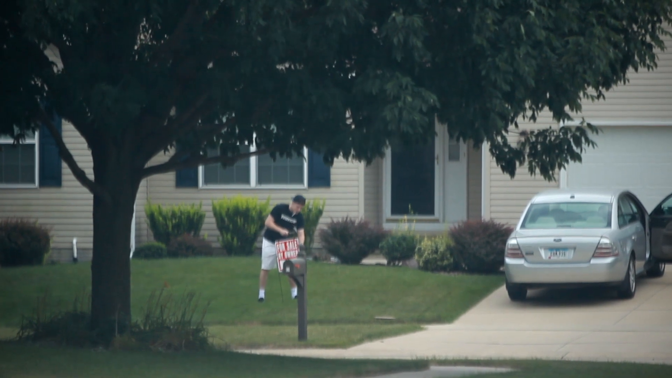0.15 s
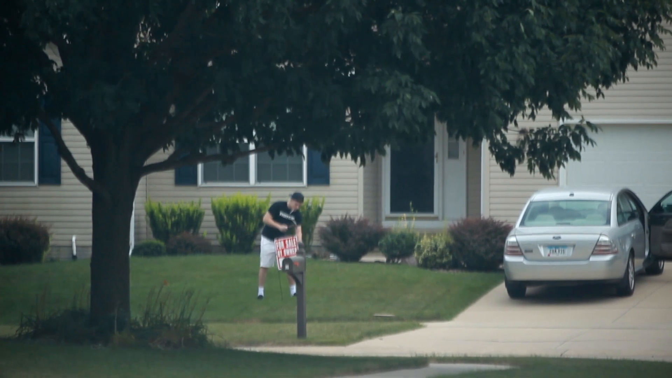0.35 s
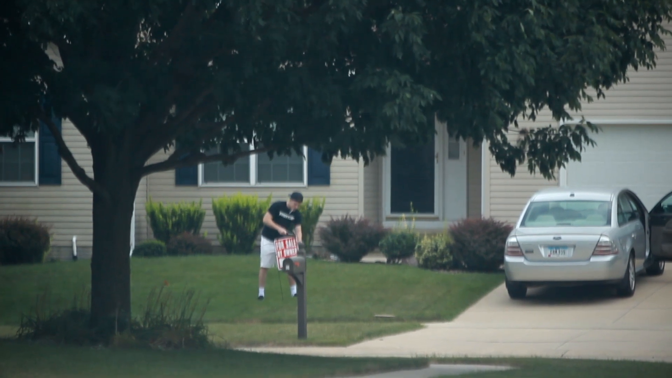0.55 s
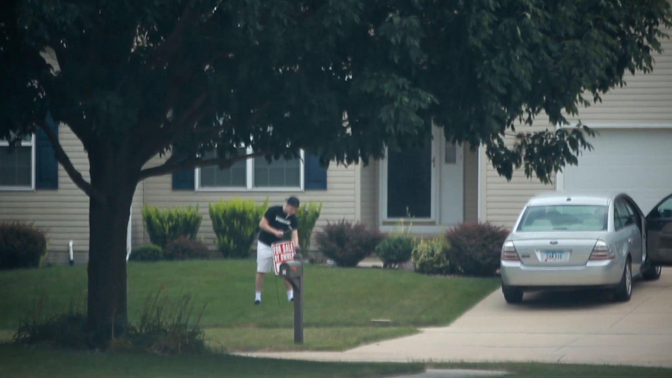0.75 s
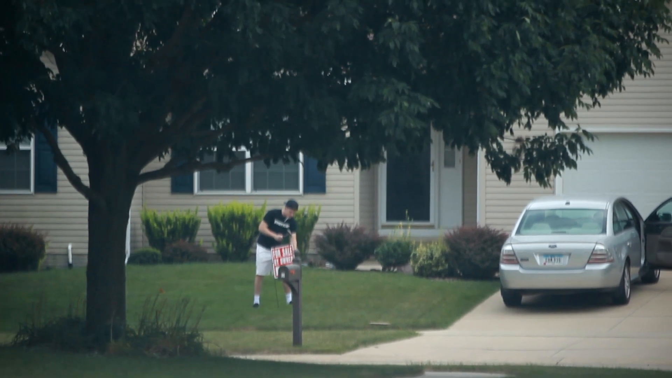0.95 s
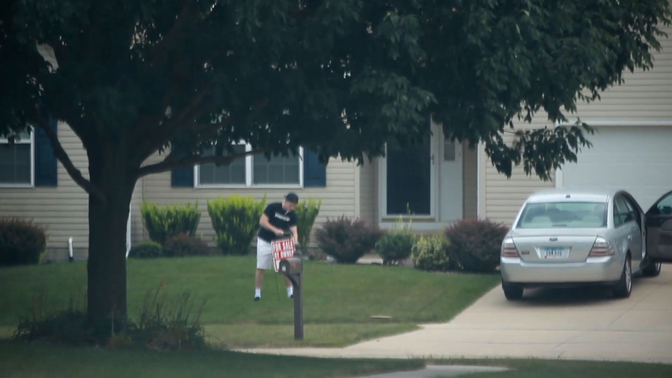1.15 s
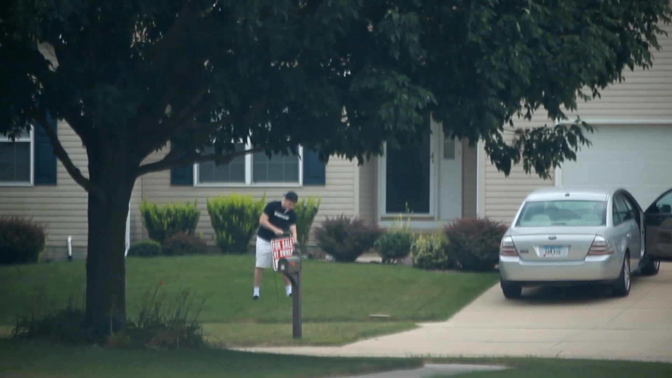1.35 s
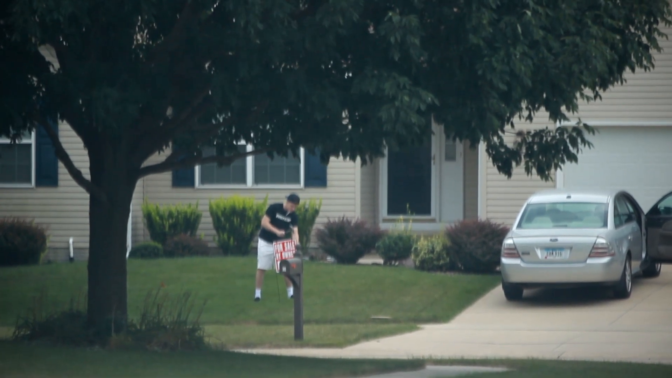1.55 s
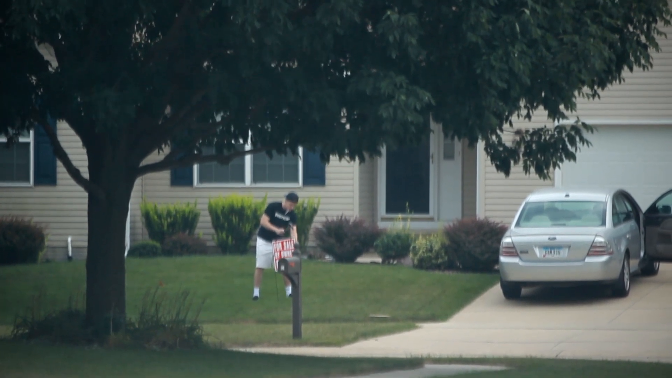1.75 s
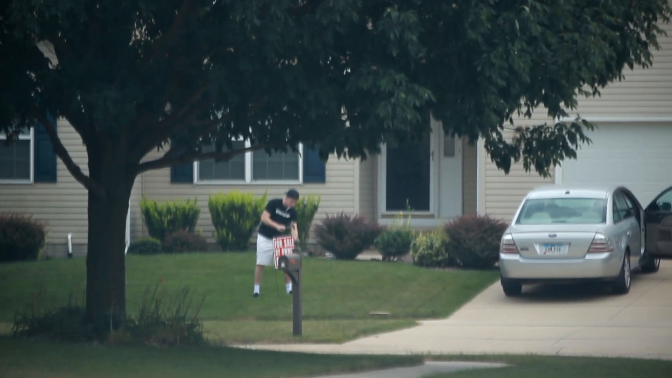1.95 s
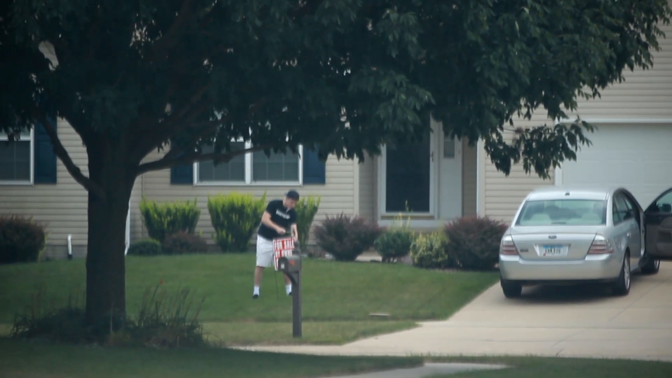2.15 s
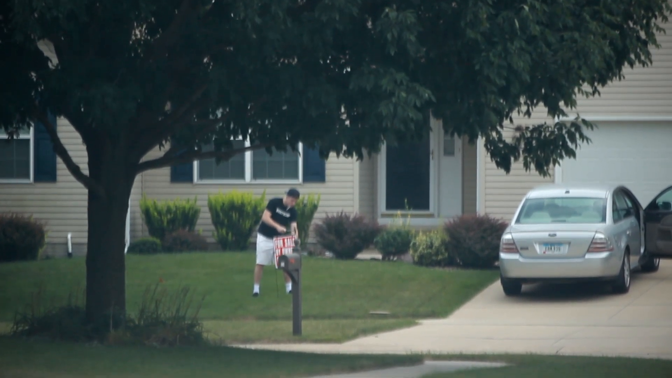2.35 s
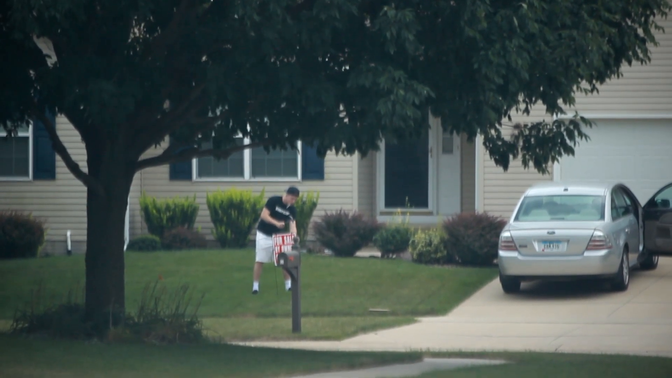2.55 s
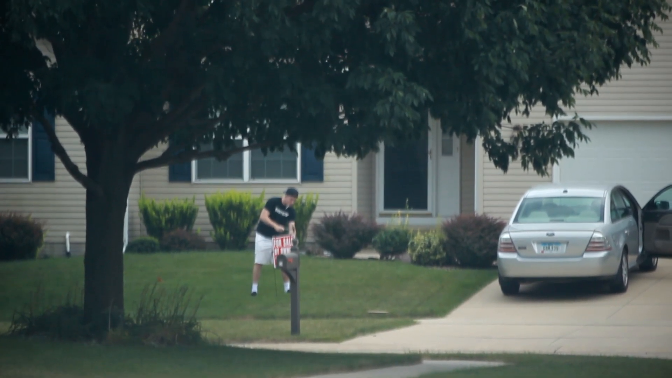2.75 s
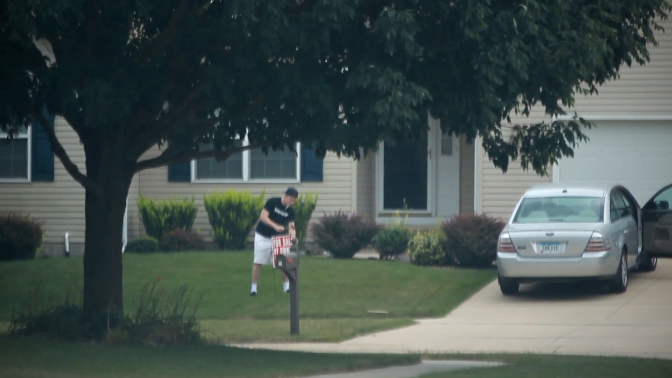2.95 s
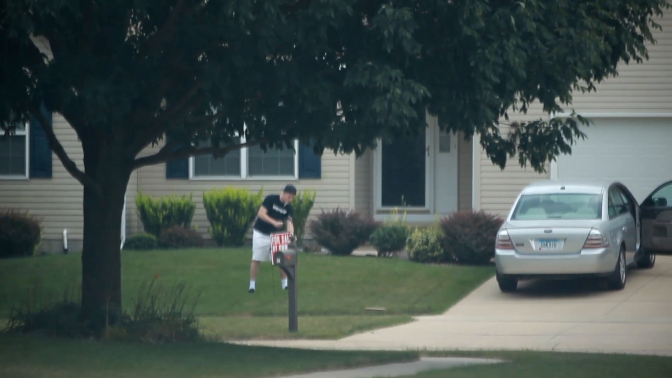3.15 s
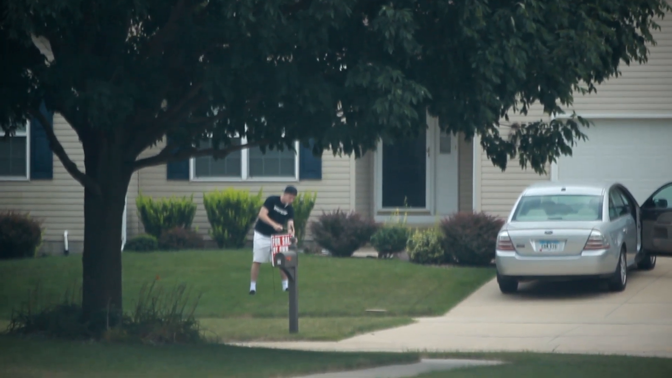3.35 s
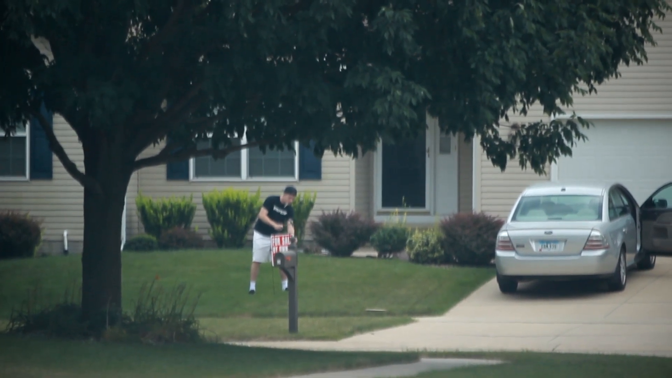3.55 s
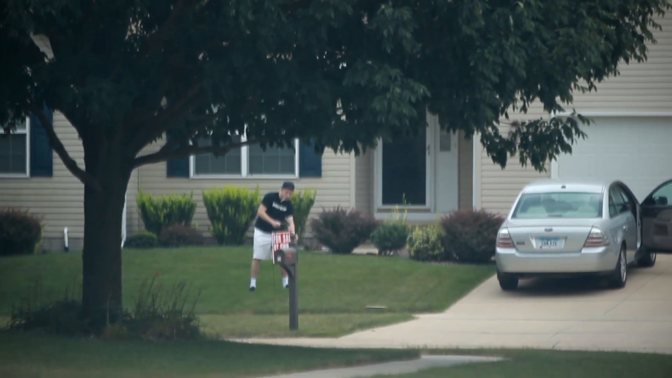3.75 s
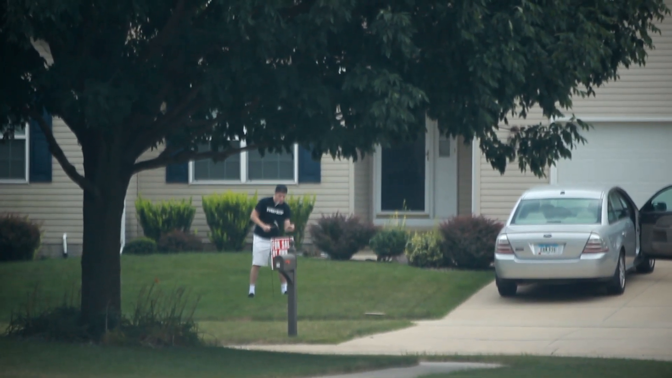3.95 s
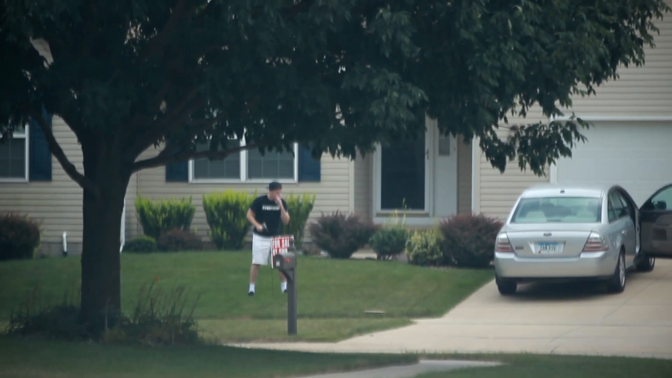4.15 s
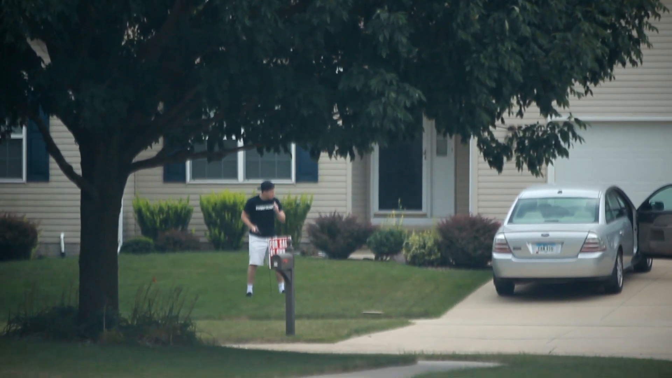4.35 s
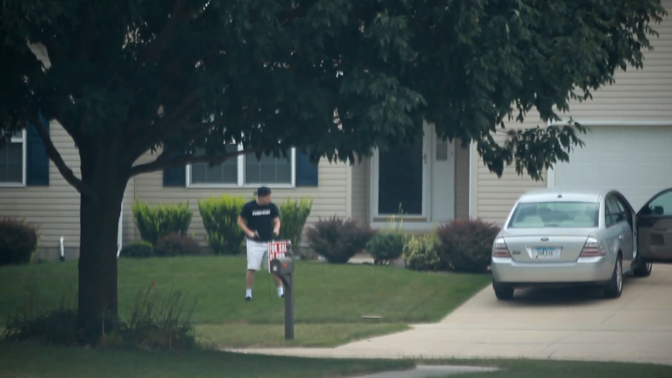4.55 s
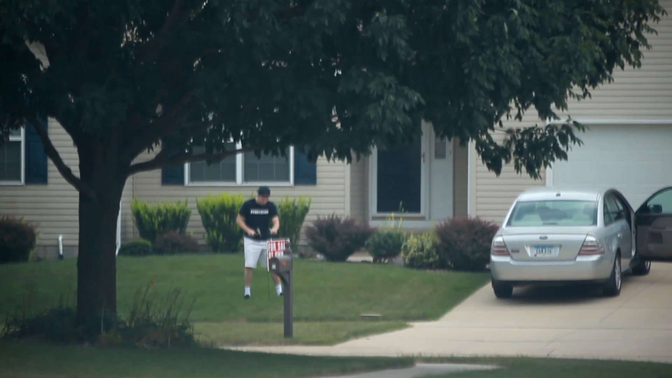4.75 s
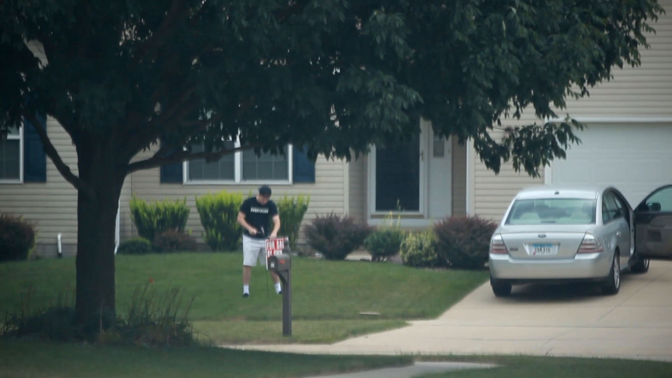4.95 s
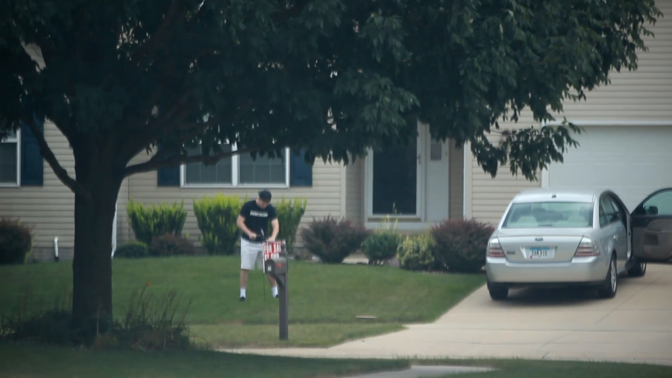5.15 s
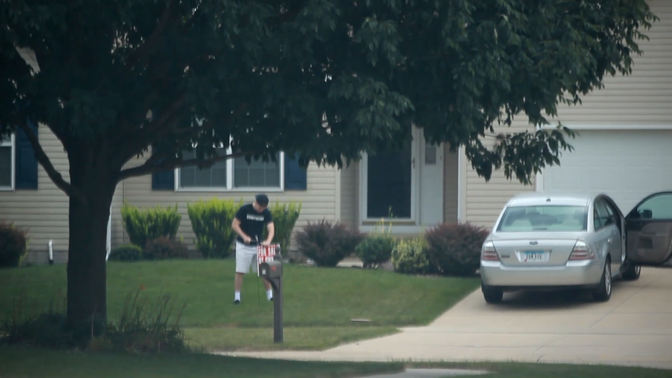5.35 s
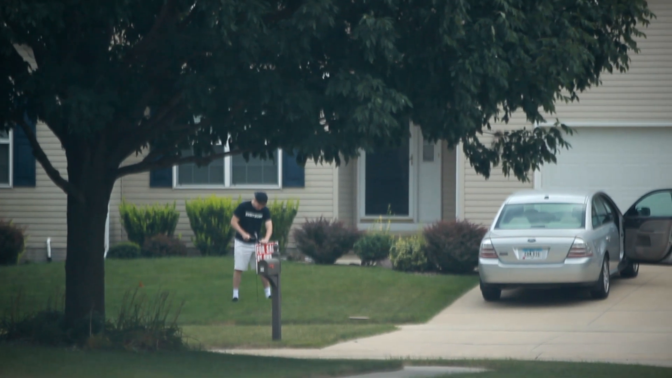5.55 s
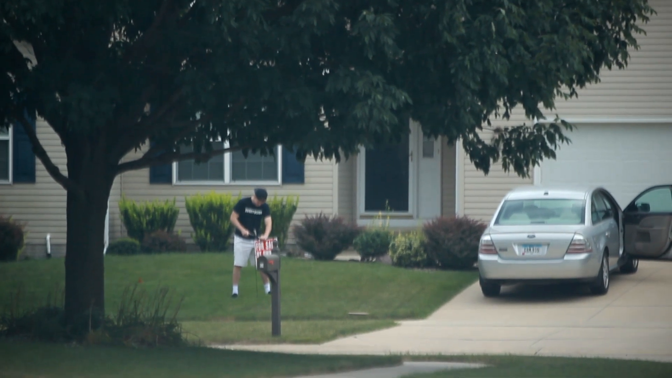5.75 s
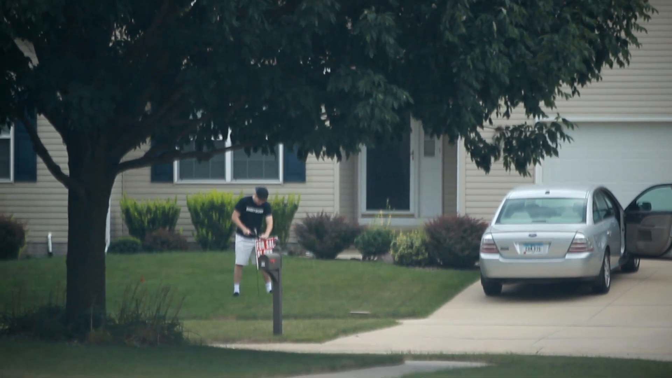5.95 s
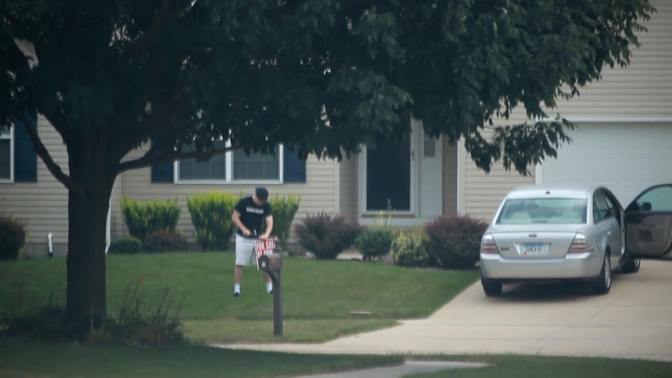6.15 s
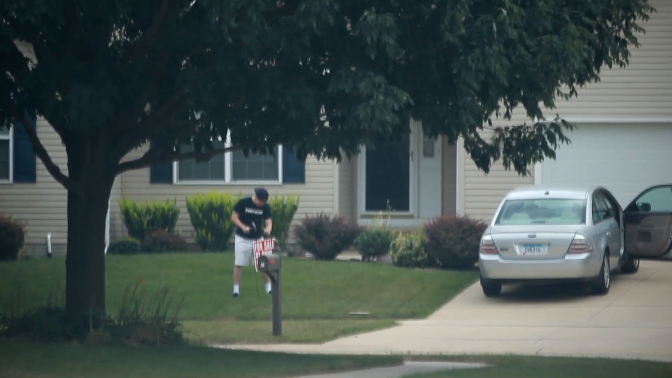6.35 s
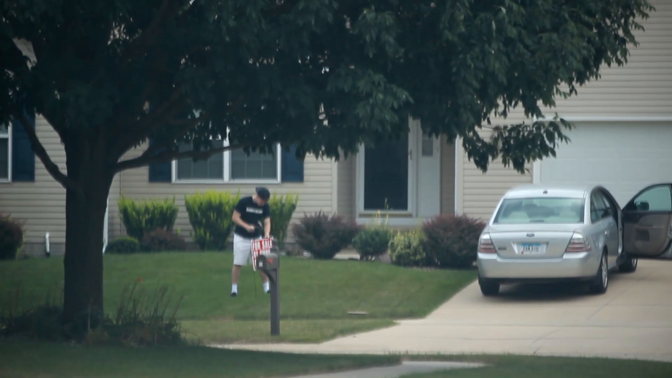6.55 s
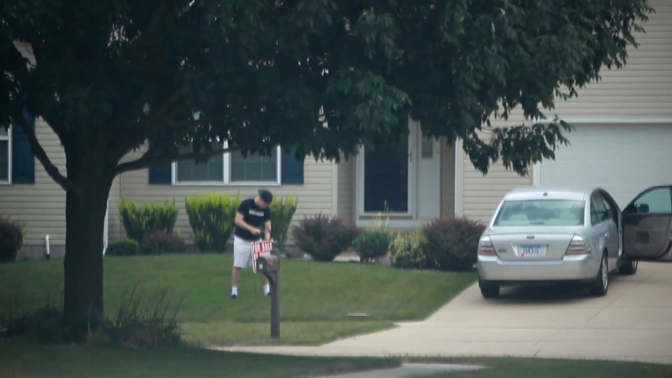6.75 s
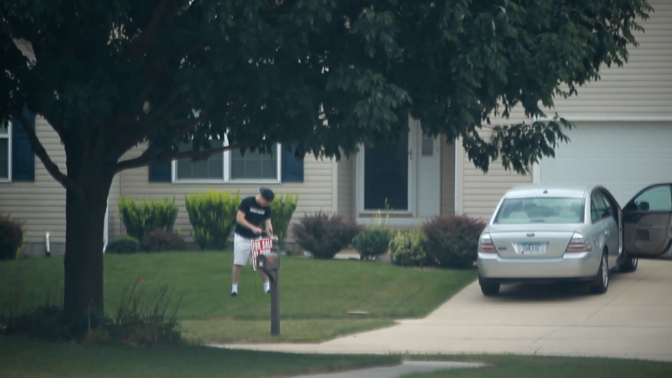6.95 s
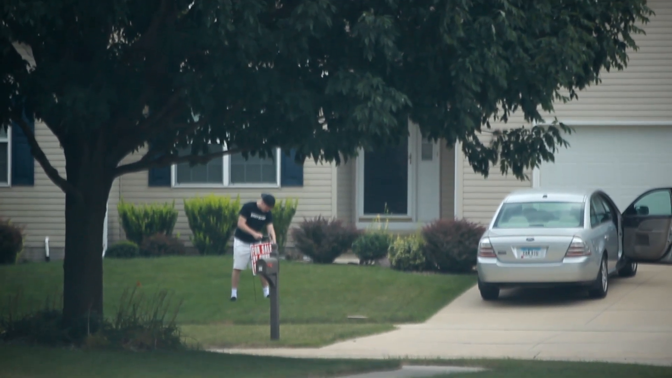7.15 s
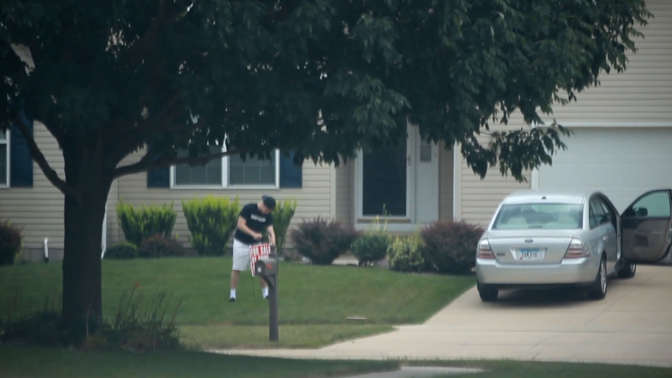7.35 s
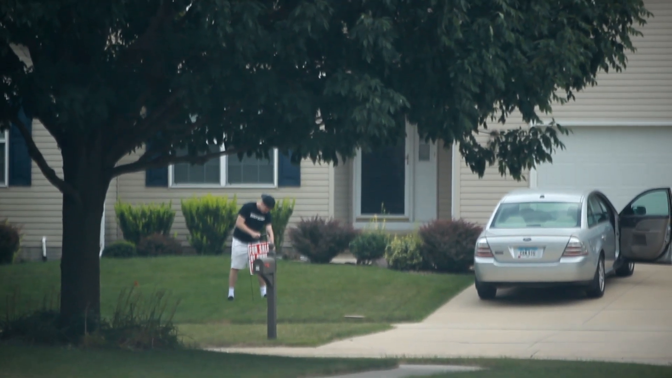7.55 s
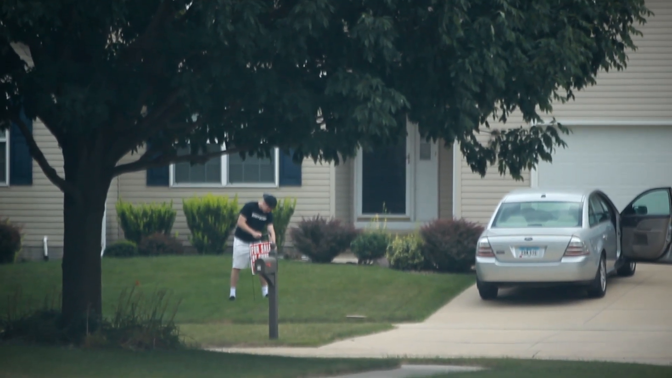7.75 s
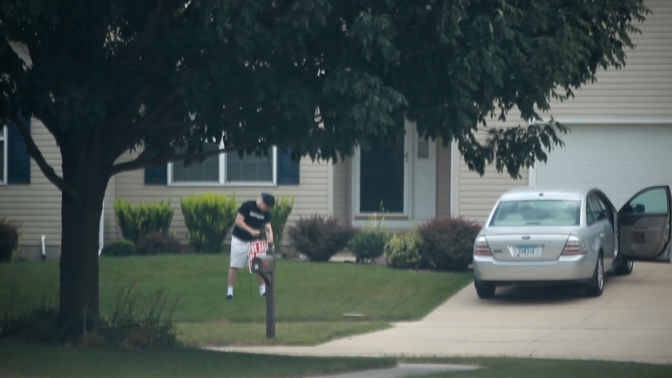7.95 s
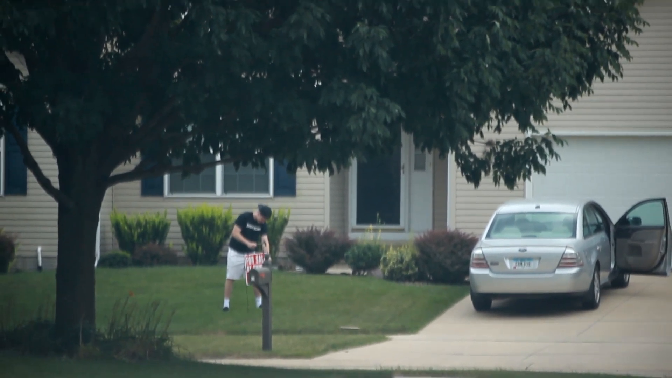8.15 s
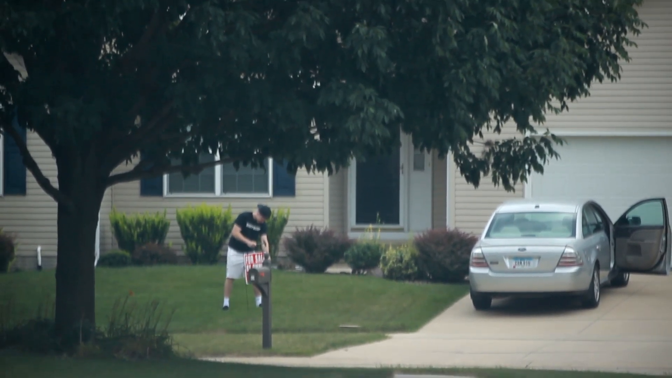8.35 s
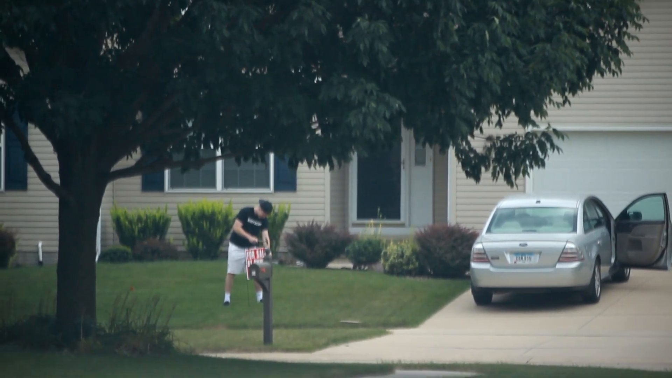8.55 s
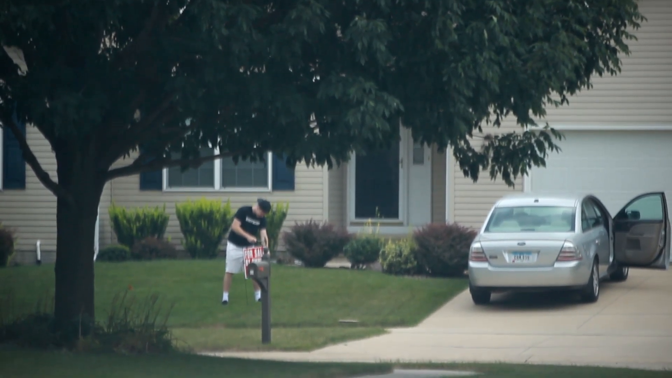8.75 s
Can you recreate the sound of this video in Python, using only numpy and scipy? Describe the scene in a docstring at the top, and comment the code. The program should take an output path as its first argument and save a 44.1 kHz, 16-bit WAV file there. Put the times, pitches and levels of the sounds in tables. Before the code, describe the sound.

Outdoors in a quiet front yard, a steel hammer hits the thin metal stake of a yard sign. Twelve strong clanks come about four a second, then a pause, a shorter, softer run, another brief gap and a final steady run. Each blow has a bright ring, sharp crack, short echo and slight soil thud. The panel rattles and ticks; distant traffic, insects and light wind stay faint beneath, heard through one microphone.

```python
"""Distant traffic, insects and light wind on the microphone come first: filtered noise that swells in three ranges.
Half a second in, a steel hammer starts driving the metal stake of a yard sign into a lawn, in three runs of blows.
Each blow rings stake and hammer head as decaying modes, with a noise crack, its echo and a thud from the soil.
The sign panel booms in resonances and crackles with random slaps; knocks and small dry ticks fall around the blows."""
import sys
import numpy as np
from scipy import signal
from scipy.fft import rfft, irfft
from scipy.io import wavfile
from scipy.ndimage import uniform_filter1d

SR = 44100
rng = np.random.default_rng(int(sys.argv[2]) if len(sys.argv) > 2 else 0)


def waveform_to_disk(signal):
    """Save audio, clipped to [-1, 1], as 16-bit WAV at the path in sys.argv[1]."""
    frames = np.transpose(np.atleast_2d(signal))
    scaled = np.clip(frames, -1, 1) * 32767
    samples = np.round(scaled).astype(np.int16)
    wavfile.write(sys.argv[1], SR, samples)


N = 392490

# hammer blows, with relative levels; a low stake_db means a glancing blow, head rings lie near 6.5, 11.5 and 13 kHz:
# time_s, level_db, stake_db, head_6k5_db, head_11k5_db, head_13k_db, contact_ms, panel_shake_db
HAMMER_BLOWS = [(0.548, -13.5, -27, -26, -23, -23, 23, -42), (0.89, -3, -25, -30.5, -14, -26, 10, -39.5),
                (1.152, -4, -4, -31, -14, -18, 8.2, -34.5), (1.41, 1.5, -12.5, -32, -14.5, -30, 4.6, -43.5),
                (1.65, 2.5, -13.5, -37.5, -37, -29, 3.1, -35), (1.893, 2.5, -14.5, -35.5, -17, -29, 2, -39),
                (2.157, 2, -9.5, -31, -33, -33, 3.7, -42.5), (2.421, 1, -26, -28, -18, -35, 5.4, -40),
                (2.752, -2, -16, -30.5, -15, -30, 3.4, -35.5), (3.041, 0, -14, -34, -25, -33, 5.9, -34),
                (3.338, -1, -12.5, -45, -26, -30, 7, -34.5), (3.657, 2.5, -10, -38.5, -19.5, -29, 3.8, -40),
                (5.284, -8, -21, -39, -16, -34, 4.3, -37.5), (5.335, -22.5, -25, -28, -28, -29, 6.1, -41),
                (5.552, -15, -24, -35.5, -24, -32, 3.4, -41),
                (5.761, -10.5, -10.5, -27, -15, -27, 7.1, -29.5),
                (5.962, -7, -19.5, -36.5, -26, -33, 2.1, -36),
                (6.177, -6.5, -22.5, -31.5, -19, -32, 2.4, -36),
                (7.268, -20.5, -2.5, -28, -32, -29, 5.3, -24.5),
                (7.484, -4.5, -12.5, -28.5, -17, -11.5, 5.9, -41),
                (7.68, -5.5, -13.5, -35, -32, -17, 5.2, -36.5), (7.88, -6, -15, -32, -15, -18, 6.4, -37.5),
                (8.08, -2.5, -15.5, -33, -27, -17, 4.6, -38), (8.31, -6, -12, -33.5, -30, -25, 1.4, -36),
                (8.553, -4, -10.5, -32, -16, -32, 6.4, -37), (8.826, -3.5, -9.5, -39.5, -30, -27, 4.5, -38)]


def undb(db):
    """Decibels to an amplitude factor."""
    return 10 ** (np.asarray(db) / 20)


def unit(x):
    """Scale to an RMS of 1."""
    return x / np.sqrt(np.mean(x ** 2))


def on_log(hz, table):
    """Read a (hz, value) table on a log-frequency axis."""
    table_hz, values = np.transpose(table)
    return np.interp(np.log(np.maximum(hz, 1)), np.log(table_hz), values)


def colour(x, table):
    """Shape x by a (hz, db) spectrum."""
    gain = undb(on_log(np.fft.rfftfreq(len(x), 1 / SR), table))
    return irfft(rfft(x) * gain, len(x))


def band(x, hz, width):
    """Two-pole resonance, gain 1 at the centre."""
    b, a = signal.iirpeak(min(hz, .45 * SR), hz / width, fs=SR)
    return signal.lfilter(b, a, x)


def butter(x, hz, kind="low"):
    """Second-order Butterworth filter."""
    return signal.sosfilt(signal.butter(2, hz, kind, fs=SR, output="sos"), x)


def smooth_lows(x, hz):
    """The part of x below hz, filtered forward and backward so that it is not delayed."""
    return signal.sosfiltfilt(signal.butter(2, hz, fs=SR, output="sos"), x)


def walk(rate):
    """Random levels held 1 / rate s, smoothed twice over that time, RMS 1."""
    k = int(SR / rate)
    steps = np.repeat(rng.standard_normal(N // k + 1), k)
    return unit(uniform_filter1d(uniform_filter1d(steps, k), k)[:N])


def add(out, s, x):
    """Mix x into out from time s."""
    i = int(s * SR)
    out[i:i + len(x)] += x[:N - i]


def street():
    """Distant traffic, insects near 5 kHz and wind on the microphone; each range of the noise swells on its own."""
    # relative spectrum of the place: freq_hz, density_db
    street_spectrum = [(12, -39), (20, 4), (111, -6), (165, -11), (305, -12.5), (428, -12.5), (599, -12.5),
                       (670, -15.5), (863, -12), (2370, -24.5), (3520, -28), (4930, -22.5), (7100, -30),
                       (13900, -36), (16500, -51.5)]
    # level of the bed over time: time_s, level_db
    street_level = [(0.0, -57.5), (2.6, -56.5), (4.83, -59), (6.0, -56.5), (7.09, -59), (8.9, -58.5)]
    # one puff of wind on the microphone: time_s, peak_db, spread_ms
    puff_s, puff_db, puff_ms = (4.144, -37, 12)
    t = np.arange(N) / SR
    hiss = colour(rng.standard_normal(N), street_spectrum)
    hiss /= np.std(butter(hiss, [100, 3000], "band"))
    wind = smooth_lows(hiss, 95)
    traffic = smooth_lows(hiss - wind, 2500)
    insects = hiss - wind - traffic
    bed = wind * undb(3.5 * walk(7))
    bed += traffic * undb(1.7 * walk(8.2))
    bed += insects * undb(1.1 * walk(7.1))
    after = t - puff_s
    swell = np.exp(-(1000 * after / puff_ms) ** 2 / 2)
    puff = -undb(puff_db) * np.cos(2 * np.pi * 22 * after) * swell
    return bed * undb(np.interp(t, *np.transpose(street_level))) + puff


def ticks():
    """Small dry ticks of panel, frame and handling: short decaying noise in one band, singly and in faint patter."""
    # single ticks: time_s, peak_db, centre_hz, width_share (of the centre, limited below)
    single_ticks = [(0.652, -22, 10000, 1.1), (0.696, -27, 10500, 0.64), (0.745, -28, 11000, .7),
                    (0.797, -28.5, 9000, 2), (0.849, -33.5, 9000, 1.6), (1.778, -38, 5000, 1.6),
                    (2.519, -21.5, 5960, 1.9), (2.554, -21, 9700, 0.41), (2.58, -22, 9000, 1.5),
                    (2.817, -32.5, 4060, 1.6), (3.786, -40, 2300, .3), (4.288, -27, 10700, 1.33),
                    (4.299, -38, 10000, .9), (4.306, -36, 8500, .8), (4.316, -43, 9500, .9),
                    (4.335, -48, 1050, .12), (4.357, -39.5, 1100, 0.47), (4.358, -36.5, 7500, 1.2),
                    (4.366, -39, 9000, 0.77), (4.377, -37, 9500, 1.6), (4.447, -38, 12300, .37),
                    (4.501, -40, 804, .45), (5.029, -35, 4400, 1.6), (5.413, -38.5, 8000, 1.5),
                    (6.37, -42, 2760, .7), (7.143, -41.5, 7780, .55), (7.73, -29, 4900, 1.5),
                    (7.932, -31, 3420, 0.91), (8.128, -21.5, 8000, 1.4), (8.195, -34, 9000, 1.1),
                    (8.272, -44, 10500, .5)]
    # patter at random moments: start_s, length_s, ticks_per_s, typical_peak_db, typical_centre_hz
    patter = [(5.805, .7, 28, -52.5, 2540), (6.902, .12, 14, -50.5, 2720)]
    scatter_db, patter_share = 4.5, 0.54
    out, t = np.zeros(N), np.arange(2048) / SR
    rows = list(single_ticks)
    for start, length, rate, db, hz in patter:
        moments = np.cumsum(rng.exponential(size=64) / rate)
        for s in moments[moments < length]:
            louder, higher = rng.standard_normal(2)
            tick_hz = hz * (1 + 0.17 * np.tanh(higher))
            rows.append((start + s, db + scatter_db * louder, tick_hz, patter_share))
    for s, db, hz, share in rows:
        width = hz * np.clip(share, .1, 1.7)
        t60 = 0.0082 + 22 / hz  # seconds; low taps ring longer
        burst = rng.standard_normal(len(t)) * undb(-60 * t / t60)
        tick = band(band(burst, hz, width), hz, width)
        add(out, s - .001, undb(db) * tick / np.abs(tick).max())
    return out


def knocks():
    """Dull knocks of the panel flexing, plus the soil's thud under the blow at 3.66 s: a short push into one
    bending mode and its neighbour."""
    # time_s, peak_db, pitch_hz
    panel_knocks = [(0.619, -26.5, 221), (0.654, -29, 375), (0.695, -31, 236), (0.71, -25, 435),
                    (0.794, -36.5, 240), (2.481, -25.5, 237), (2.497, -28.5, 447), (2.529, -35, 432),
                    (2.555, -25.5, 363), (2.578, -26, 304), (3.659, -26, 423), (4.353, -45, 296),
                    (8.13, -35, 344)]
    t60_s = 0.029
    out, t = np.zeros(N), np.arange(4096) / SR
    for s, db, hz in panel_knocks:
        shape = (1 - np.exp(-t / 0.0024)) * undb(-60 * t / t60_s)
        neighbour = np.sin(2 * np.pi * 1.63 * hz * t + 2 * np.pi * rng.random())
        knock = shape * (np.sin(2 * np.pi * hz * t) + 0.38 * neighbour)
        add(out, s, undb(db) * knock / np.abs(knock).max())
    return out


def rustle(grain=0.41, scatter_db=8.0):
    """Slaps of the sheet on its frame; each excites only a part of the spectrum for a moment."""
    # centre_hz, width_hz, slaps_per_s
    slap_bands = [(1300, 1400, 500), (2700, 1800, 250), (5500, 3500, 300), (8500, 3500, 250),
                  (12000, 6000, 300)]
    # relative spectrum of the crackle: freq_hz, density_db
    crackle_spectrum = [(500, 4), (900, 1.5), (1500, -1), (3000, -1.5), (4900, -15), (7500, -14),
                        (10500, -9), (14500, -11.5), (16500, -25.5)]
    decay = np.exp(-1 / (0.0039 * SR))  # per sample, 3.9 ms time constant
    out = np.zeros(N)
    for hz, width, rate in slap_bands:
        strength = undb(scatter_db * np.minimum(rng.exponential(size=N), 2.8))
        clicks = (rng.random(N) < rate / SR) * strength
        slaps = unit(signal.lfilter([1], [1, -decay], clicks))
        out += band((slaps + grain) * rng.standard_normal(N), hz, width)
    return unit(colour(out, crackle_spectrum))


def panel():
    """The sign panel booms in its bending modes and crackles against the frame while it shakes."""
    # long wobbles: start_s, length_s, boom_db, crackle_db
    wobbles = [(0.574, 0.14, -41, -41.5), (2.463, 0.13, -41.5, -41.5), (5.36, .04, -57, -53),
               (8.078, 0.1, -46, -50)]
    # bending modes, with relative levels: centre_hz, width_hz, level_db
    bending = [(193.8, 450, 2.5), (289, 47, 0.6), (398, 200, 0), (480, 350, -9)]
    wobble_rise_s, wobble_t60_s, shake_t60_s = 0.043, 0.56, 0.48
    t, boom, crackle = np.arange(N) / SR, np.zeros(N), np.zeros(N)
    for s, length, boom_db, crackle_db in wobbles:
        rise = np.clip((t - s) / wobble_rise_s, 0, 1)
        swing = rise * undb(-60 * np.maximum(t - s - length, 0) / wobble_t60_s)
        boom += undb(boom_db) * swing
        crackle += undb(crackle_db) * swing
    after = t[:SR // 2]
    for s, db, *_, shake_db in HAMMER_BLOWS:
        shake = undb(db + shake_db - 60 * after / shake_t60_s) * (1 - np.exp(-after / 0.011))
        add(crackle, s, shake)
        add(boom, s, undb(-2.5) * shake)
    drive = rng.standard_normal(N) * undb(3.0 * walk(45))
    bend = np.zeros(N)
    for hz, width, db in bending:
        bend += undb(db) * band(band(drive, hz, width), hz, 2 * width)
    return boom * unit(bend) + crackle * rustle()


def ring(modes, t, rough, scatter_db=3.5, detune=0.0051):
    """Decaying modes; every blow feeds each differently, and loose joints make each ring waver."""
    hz, db, t60 = np.transpose(modes)[:, :, None]
    pitch_chance, level_chance, phase_chance = rng.standard_normal((3, len(modes), 1))
    noise = rng.standard_normal((len(modes), len(t)))
    waver = uniform_filter1d(noise, size=200, axis=1) * np.sqrt(200)
    phase = 2 * np.pi * (hz * (1 + detune * pitch_chance) * t + phase_chance) + rough * waver
    level = undb(db + scatter_db * level_chance - 60 * t / t60)
    return (np.sin(phase) * level).sum(axis=0)


def stake(t, stake_db):
    """The struck stake rings in body modes, which also linger fainter and longer, and in top modes of fixed level."""
    # modes of the body and of the top, with relative levels: freq_hz, level_db, t60_s
    body_modes = [(840, -11, .05), (960, -10, .05), (1211, -5, .1), (1368, -3, .095), (1469, -3, .09),
                  (1765, -7, .08), (1850, -10, .06), (2150, -10, .07), (2380, -12, .06), (2710, -9, .065),
                  (3250, -12, .08)]
    top_modes = [(4786, -19, .07), (7900, -12, .045), (8208, -9, .06), (8522, -11, .075), (9393, -13, .055),
                 (10200, -10, .05), (10410, -9, .065), (10955, -10, .06), (11171, -12, .05),
                 (12100, -15, .045), (12650, -15, .05), (13950, -16, .07)]
    body_trim_db, top_trim_db = -6.5, -9
    linger_db, linger_times = -17, 2.1  # the free part of the stake rings on
    free_modes = [(hz, db + linger_db, t60 * linger_times) for hz, db, t60 in body_modes]
    top = ring(top_modes, t, rough=.4, scatter_db=3.0)
    body = ring(body_modes, t, rough=.3, scatter_db=4.5)
    body += ring(free_modes, t, rough=.3, scatter_db=5.5)
    return undb(top_trim_db) * top + undb(body_trim_db + stake_db) * body


def hammer_head(t, glance, pair_db, upper_db):
    """Four modes of the steel head; the second of the low pair gains on the first as the blow glances."""
    # freq_hz, t60_s
    head_modes = [(6401, .3), (6746, .13), (11487, .085), (13033, .13)]
    trim_db = -2
    twin_db = pair_db - 5.5 + 0.76 * glance
    levels_db = [pair_db, twin_db, *upper_db]
    modes = [(hz, trim_db + db, t60) for (hz, t60), db in zip(head_modes, levels_db)]
    return ring(modes, t, rough=.4, scatter_db=1.0, detune=0)


def fading(t, decays, hold_s):
    """Noise in the colour of the crack; each octave holds, then dies at its own pace."""
    # relative spectrum of the crack: freq_hz, density_db
    crack_spectrum = [(59, -59), (100, -24.5), (628, -11), (1350, -14.5), (1990, -12), (3180, -7),
                      (4480, -12.5), (4880, -7), (7170, -10.5), (10100, -3), (14200, -6), (15500, -16.5),
                      (16500, -52.5)]
    noise = unit(colour(rng.standard_normal(len(t)), crack_spectrum))
    spectrum, hz = rfft(noise), np.fft.rfftfreq(len(t), 1 / SR)
    dying_s = np.maximum(t - hold_s, 0)
    out = np.zeros(len(t))
    for mid in 125 * 2. ** np.arange(8):
        octaves_off = np.clip(np.log2(np.maximum(hz, 1) / mid), -1, 1)
        octave = np.cos(np.pi / 2 * octaves_off) ** 2
        out += irfft(spectrum * octave, len(t)) * undb(-60 * dying_s / on_log(mid, decays))
    return out


def crack_and_echo(t, hold_s):
    """Steel bounces on steel, so the crack comes in uneven pushes; its echo swells in after it."""
    # decay of the crack at the stake: freq_hz, t60_s
    crack_decay = [(150, 0.04), (1000, 0.16), (3000, 0.084), (8000, 0.037), (15000, 0.034)]
    # decay of the echo off house fronts and trees: freq_hz, t60_s
    echo_decay = [(150, 0.45), (1000, .35), (3000, 0.13), (8000, 0.11), (15000, 0.1266)]
    crack_db, echo_db = -14.5, -31
    bounce = rng.standard_normal(len(t)) ** 3
    uneven = unit(uniform_filter1d(np.abs(bounce), size=40)) ** 0.84
    # walls and trunks answer one by one, so the tail comes in lumps
    patchy = unit(uniform_filter1d(bounce ** 2, size=160)) ** .35
    crack = undb(crack_db) * (1 - np.exp(-t / 0.00041)) * uneven * fading(t, crack_decay, hold_s)
    echo = undb(echo_db) * (1 - np.exp(-t / 0.013)) * patchy * fading(t, echo_decay, hold_s)
    return crack + echo


def soil_thud(t, glance):
    """The soil answers with a dull noise near 320 Hz, weaker the more the blow glances."""
    dull = band(band(rng.standard_normal(len(t)), 320, 352.6), 320, 352.6)
    return undb(-34.5 - 0.58 * glance - 60 * t / 0.15) * unit(dull)


def hammer():
    """Each blow: contact feeds the rings of stake and head, a crack with its echo, and a thud."""
    square_db = -12.5  # stake ring of a squarely struck blow
    pole = np.exp(-2 * np.pi * 3500 / SR)  # one-pole low-pass at 3.5 kHz
    out, t = np.zeros(N), np.arange(1 << 14) / SR
    for s, db, stake_db, pair_db, *upper_db, contact_ms, _ in HAMMER_BLOWS:
        glance = square_db - stake_db  # dB short of a square blow
        hold_s = max(contact_ms, 1) / 1000
        builds = 1 - np.exp(-(t / hold_s) ** 2 * 3.0)  # rings grow while the contact lasts
        rings = builds * (stake(t, stake_db) + hammer_head(t, glance, pair_db, upper_db))
        scatter = crack_and_echo(t, hold_s)
        # glancing blows are thin and bright, square ones full
        lows = signal.lfilter([1 - pole], [1, -pole], scatter)
        full_gain = undb(2.5 - 0.33 * glance)
        blow = rings + scatter + (full_gain - 1) * lows
        blow = butter(blow, 400, "high")  # a thin stake radiates little bass
        thud = builds * soil_thud(t, glance)
        add(out, s - .001, undb(db) * (blow + thud))
    return out


def scene():
    """The place, the sign and the hammer, mixed to one channel."""
    return (street() + ticks() + knocks() + panel() + hammer())[None]


def record(dry):
    """The microphone droops at the very top, the loudest peaks are rounded and the recorder cuts the top off."""
    droop = butter(dry, 15500)
    rounded = .93 * np.tanh(droop / .93)
    return signal.sosfilt(signal.ellip(10, .2, 80, 16300, fs=SR, output="sos"), rounded)


dry = scene()
out = record(dry)
waveform_to_disk(out)
```